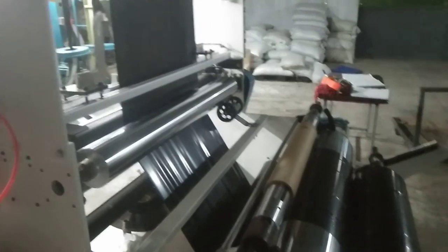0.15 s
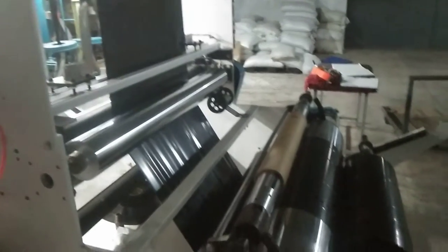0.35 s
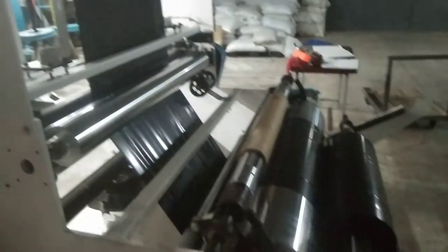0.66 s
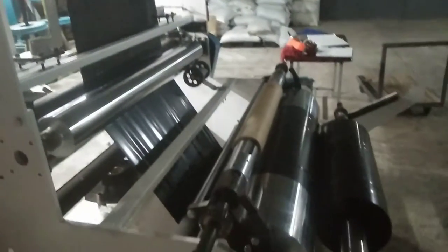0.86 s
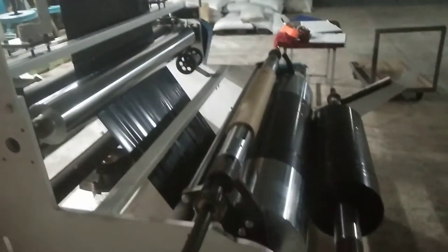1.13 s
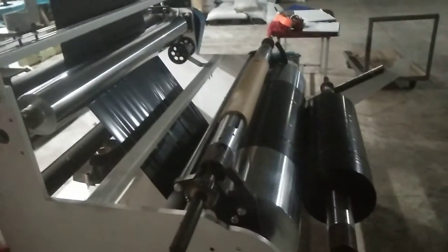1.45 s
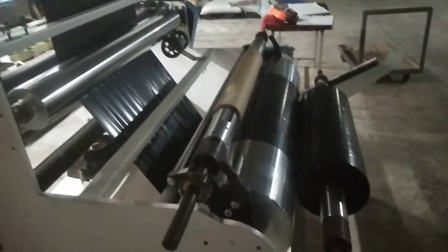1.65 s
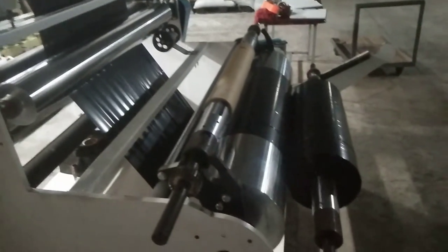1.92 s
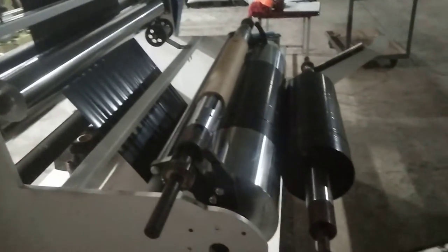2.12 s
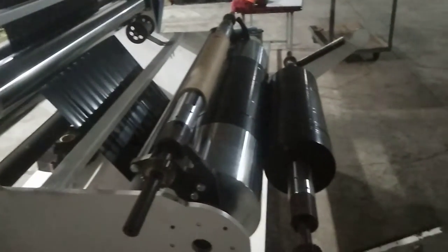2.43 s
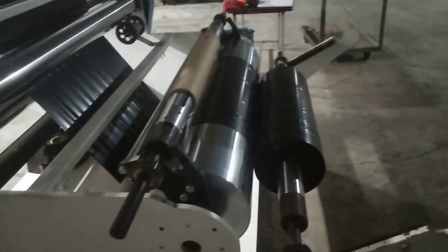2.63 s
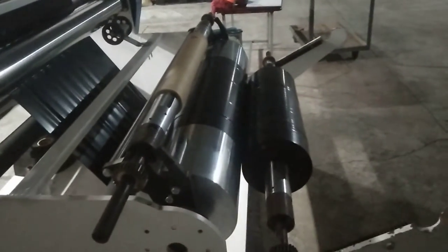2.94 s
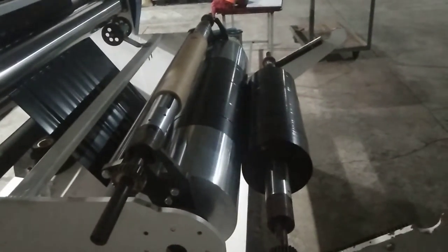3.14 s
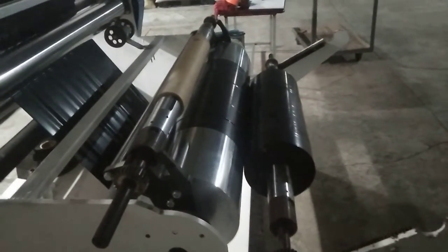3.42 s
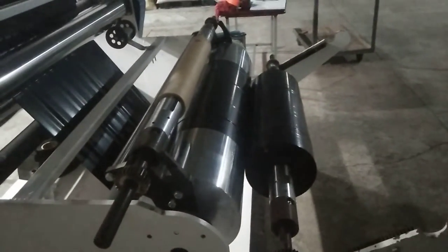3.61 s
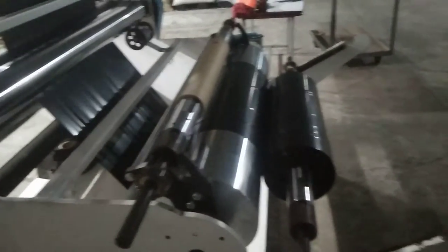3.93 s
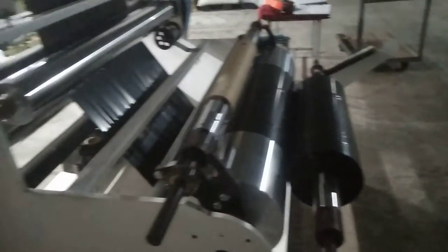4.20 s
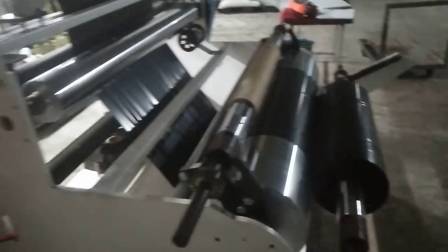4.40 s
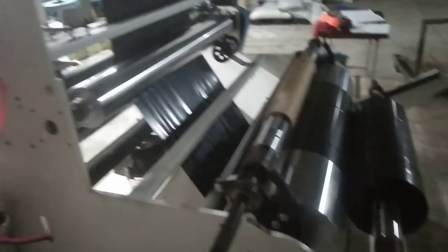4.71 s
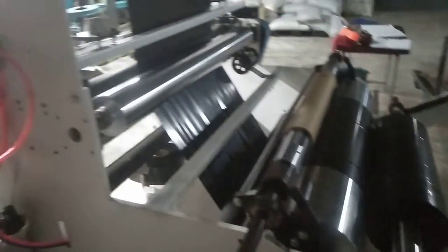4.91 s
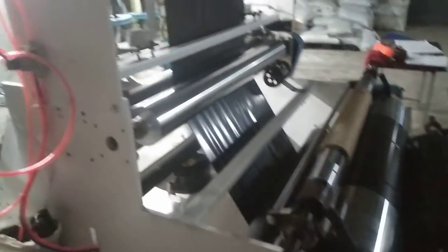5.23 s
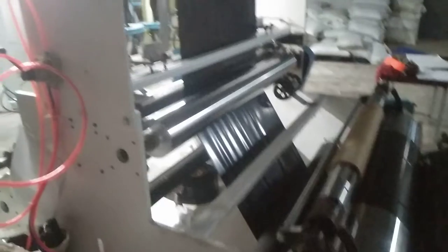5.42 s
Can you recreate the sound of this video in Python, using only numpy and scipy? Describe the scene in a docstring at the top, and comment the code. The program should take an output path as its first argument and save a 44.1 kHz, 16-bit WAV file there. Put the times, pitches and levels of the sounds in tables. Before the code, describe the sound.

For about 5.5 seconds a plastic film winding line runs without pause in a reverberant factory hall, heard from a handheld phone close to the rollers. A loud, shrill cluster of motor tones around 4 kHz dominates, beating into a fast metallic buzz of nearly sixty pulses a second. Fainter, higher tones edge it. Beneath sit a steady low hum, rapid shaft rattle repeating about sixteen times a second, blower roar growing very slightly, and bright hiss from air and film. From about 0.7 to 2.5 seconds, as the phone swings out, the buzz smears into denser flutter; around 3 to 4 it returns to clearer falling chirps, then smears again on the way back. Individual tones swell and dip throughout. A more distant motor near 2 kHz wavers in uneven bursts, most noticeable around 4.3 seconds. Overall loudness stays fairly even, slightly compressed, ending with the machine still running.

```python
"""A factory hall, close to the winder of a plastic film line, heard from a phone that swings slowly
out over the rollers and back.
Inverter-fed motors whine: sidebands round a 4 kHz switching rate beat into a fast buzz, and the loud
ones dip as the phone crosses nodes of their standing waves.
Under them lie the hum of motors and gears, shaft clatter, blower roar and the hiss of air and film."""
import sys
import numpy as np
from scipy import signal
from scipy.fft import rfft, irfft
from scipy.io import wavfile
from scipy.ndimage import uniform_filter1d

SR = 44100
rng = np.random.default_rng(int(sys.argv[2]) if len(sys.argv) > 2 else 0)


def bounce(signal):
    """Save signal as a 16-bit WAV file at the path given by the first command-line argument."""
    frames = np.transpose(np.atleast_2d(signal))
    limited = np.clip(frames, -1, 1)
    pcm = np.round(limited * 32767).astype(np.int16)
    wavfile.write(sys.argv[1], SR, pcm)


N = 245195
TIME = np.arange(N) / SR  # s


def winder_whine():
    """Switched current shakes the stator; evenly spaced odd sidebands beat at twice the supply
    rate and its multiples."""
    switch_hz, supply_hz = 4000.3, 28.987
    # loud sidebands up to this one keep in step and make the beat; those beyond ring on freely
    inner_sideband = 11
    # level of the loud sidebands at the phone: start_s, level_db
    whine_level = [(0, -1), (.4, -1.5), (.75, 1.8), (2, 0.5), (2.35, -1.7), (2.75, 1.7), (3.5, -1.5),
                   (4.6, 0.5), (5, -1.5), (5.56, 1)]
    # higher sidebands arrive earlier, by an amount that changes as the phone moves, so each beat is a
    # falling chirp; long chirps overlap into a faster flutter: start_s, lag_ms_per_khz
    beat_chirp = [(0, -19), (.35, -21), (.7, -104), (1, -132), (1.5, -141), (2.05, -131), (2.5, -76),
                  (2.9, -28), (3.15, -26), (4, -28), (4.35, -64), (5.56, -70)]
    # loud sidebands, standing between the motor and the frame: sideband (multiples of the supply rate),
    # level_db, rise_db_per_cm along the path, reflected share (0-1), node_cm, node spacing_cm
    standing_sidebands = [(-19, -44, -.28, .22, 15.4, 11.4), (-17, -37.8, -.36, .24, 27.5, 12.7),
                          (-13, -37.6, .13, .2, 14.9, 9.9), (-11, -35.7, 0, .71, 17.6, 21.3),
                          (-9, -32, .23, .58, 19.4, 21.6), (-7, -32.5, -.07, .49, 4.4, 18.2),
                          (-5, -26.1, 0, .5, 25.8, 12.25), (-3, -34.3, -.15, .58, 24.5, 10.2),
                          (-1, -30.1, -.11, .62, 3.8, 17.2), (1, -28.7, -.17, .4, 15.6, 17.3),
                          (3, -28.1, .13, .31, 23.1, 20.3), (5, -33, .43, .3, 16.9, 27.6),
                          (9, -29.4, .28, .44, 18.2, 11.2), (15, -39.2, -.21, .2, 11, 7.4)]
    # faint sidebands, diffused by the hall: multiple of the switching rate,
    # sideband (multiples of the supply rate), level_db
    diffuse_sidebands = [(1, -23, -43), (1, -15, -45), (1, 11, -42), (2, -6, -47), (2, -4, -48.5),
                         (2, -2, -50.5), (2, 0, -48), (2, 2, -45), (2, 4, -59), (2, 8, -62), (3, -3, -66),
                         (3, -1, -65), (3, 3, -64), (3, 5, -62)]

    whine_db, = curves(whine_level)
    lag_ms_per_khz, = curves(beat_chirp)
    whine = np.zeros(N)
    for side, db, *reflection in standing_sidebands:
        offset_hz = side * supply_hz
        start = None
        if abs(side) <= inner_sideband:
            # a lag proportional to the offset is a phase that grows with its square
            start = -lag_ms_per_khz * (offset_hz / 1000) ** 2 / 2
        wave = standing_wave(*reflection)
        sideband = tone(switch_hz + offset_hz, scatter=0.08, rate=1.64, start=start, wave=wave)
        whine += undb(db + whine_db) * sideband
    for multiple, side, db in diffuse_sidebands:
        hz = multiple * switch_hz + side * supply_hz
        whine += undb(db) * tone(hz, scatter=0.19, rate=1.63)
    return whine


def slot_whine():
    """Rotor slots add tones off the sideband grid; the loud ones swell and dip as the phone moves."""
    # loud slot tones, each with its standing wave: pitch_hz, level_db, rise_db_per_cm along the path,
    # reflected share (0-1), node_cm, node spacing_cm
    standing_tones = [(3284, -39.5, -.08, .29, 26.5, 21.9), (3458.5, -38.2, .46, .63, 8, 18.1),
                      (4542.2, -37.9, -.1, .68, 16.2, 45), (4716, -31.3, .31, .31, 26.4, 22.6)]
    # faint slot tones riding on the switching: pitch_hz, level_db
    faint_tones = [(3401, -45), (4370, -44), (4598, -46), (5329, -47), (7372, -52), (7488, -54),
                   (8455.5, -47)]

    whine = np.zeros(N)
    for hz, db, *reflection in standing_tones:
        whine += undb(db) * tone(hz, scatter=0.07, rate=1.33, wave=standing_wave(*reflection))
    for hz, db in faint_tones:
        whine += undb(db) * tone(hz, scatter=0.24, rate=2.06)
    return whine


def machine_hum():
    """Fans and gears hum firmly, wavering slightly with the load."""
    # steady tones of fans and gears: pitch_hz, level_db
    hum_tones = [(68, -53), (161.4, -32.5), (240.2, -45.5), (1536.1, -49)]
    return sum(undb(db) * tone(hz, scatter=0.07, rate=4) for hz, db in hum_tones)


def shaft_clatter():
    """The same rattle returns at every shaft turn, smeared by the hall into a comb of harmonics."""
    shaft_hz = 15.857
    # clatter of one shaft turn, before the panels lift it: pitch_hz, level_db per harmonic
    clatter_spectrum = [(100, -51.5), (220, -47.5), (400, -47.5), (700, -49), (900, -53.5), (1300, -59.5),
                        (2000, -53), (2600, -66)]
    # harmonics that stand out: order (multiples of the turn rate), level_db
    strong_orders = [(11, -40), (19, -37), (20, -39), (23, -42), (26, -42), (33, -44), (38, -41), (40, -41),
                     (44, -43), (47, -43), (49, -44), (64, -41.5), (88, -47)]

    orders = np.arange(170)
    harmonic_hz = orders * shaft_hz
    hz, db = np.transpose(clatter_spectrum)
    level_db = np.interp(harmonic_hz, hz, db, left=-100) + panel_db(harmonic_hz)
    level_db += 1.2 * rng.standard_normal(len(orders))
    for order, strong_db in strong_orders:
        level_db[int(order)] = strong_db

    size = 4096  # points in one turn
    random_phase = np.exp(2j * np.pi * rng.random(len(orders)))
    # scaled so that each level is the rms of its harmonic
    turn = irfft(undb(level_db) * random_phase, size) * size / np.sqrt(2)
    turns = shaft_hz * TIME + 0.0027 * walk(5)  # the belt drive runs slightly unevenly
    clatter = np.interp(turns % 1, np.arange(size) / size, turn, period=1)
    return clatter * undb(1.24 * walk(8))


def second_drive():
    """A farther motor sings an octave lower, drifting a little in pitch and coming in uneven bursts."""
    # main tone of this motor, switched at 2 kHz: start_s, pitch_hz, level_db
    main_tone = [(0, 1982, -51), (.47, 1982, -43), (.9, 1983, -41), (2.2, 1980, -41), (2.8, 1979, -36),
                 (3.95, 1982, -39), (4.25, 1986, -32.5), (5.05, 1986, -37), (5.33, 1984, -34.5),
                 (5.56, 1983, -39)]
    # side tones: pitch_hz, level_db
    side_tones = [(1919, -46), (2000.5, -45), (2017.7, -43), (2080.4, -45), (2151.7, -45), (2748, -48),
                  (3102, -50), (5938, -45), (6024, -51), (6067, -48)]
    # level added to all the side tones: start_s, level_db
    sides_level = [(0, -4), (1.2, -2), (2.2, -1.5), (2.8, .5), (4.4, .5), (5.56, -1.5)]

    main_hz, main_db = curves(main_tone)
    sides_db, = curves(sides_level)
    main = undb(main_db) * tone(0, scatter=0.55, rate=22, start=np.cumsum(main_hz) / SR)
    sides = sum(undb(db) * tone(hz, scatter=0.4, rate=3) for hz, db in side_tones)
    return main + undb(sides_db) * sides


def air():
    """Blowers roar through the hall; cooling air and running film hiss with a slight flutter."""
    # blower roar, relative: pitch_hz, level_db per Hz
    roar_spectrum = [(25, -35), (45, -15), (70, -9), (100, -5.5), (130, 4.5), (160, 2.5), (200, 2.5),
                     (260, -5.5), (400, -2), (520, -5), (700, -5.5), (1200, -4.5), (2100, -6.5), (2700, -7),
                     (5000, -38)]
    # air and film hiss, relative: pitch_hz, level_db per Hz
    hiss_spectrum = [(2000, -22.5), (3100, -3), (3600, 1), (3950, 3), (4500, -0.5), (5200, -5.5),
                     (6900, -9.5), (7800, -5), (8800, -7.5), (9900, -15), (10500, -25), (12100, -24.5),
                     (13000, -39), (15500, -64)]
    # the roar grows slowly from its starting level
    roar_db, roar_rise_db_per_s, hiss_db = -26.5, 0.275, -26.5

    roar_level_db = roar_db + roar_rise_db_per_s * TIME + 0.12 * walk(4.8)
    roar = undb(roar_level_db) * coloured(roar_spectrum, ripple_db=2.0, spacing_hz=9)
    hiss_level_db = hiss_db + 0.34 * walk(16)
    hiss = undb(hiss_level_db) * coloured(hiss_spectrum, ripple_db=2.5, spacing_hz=23)
    return roar + hiss


def standing_wave(rise_db_per_cm, reflected, node_cm, spacing_cm):
    """Complex gain (rms 1) of a tone plus its reflection: it slopes along the path and dips at nodes."""
    # the phone swings out, rests and returns: start_s, place_cm along its path
    phone_path = [(0, 2.4), (.3, 2.6), (.6, 5.6), (1.5, 9.7), (2.3, 19.1), (2.9, 27.6), (3.5, 28.6),
                  (4, 27.4), (4.4, 19.9), (4.9, 9.2), (5.25, 1.5), (5.56, -1.2)]
    place_cm, = curves(phone_path)
    reflection = reflected * np.exp(2j * np.pi * (place_cm - node_cm) / spacing_cm)
    gain = undb(rise_db_per_cm * place_cm) * (1 - reflection)
    return gain / np.sqrt(np.mean(np.abs(gain) ** 2))


def panel_db(hz):
    """The lift that the ringing panels of the machine frame give to each frequency."""
    # resonances of the panels: centre_hz, width_hz, lift_db
    panels = [(297.5, 35, 4), (397, 28, 3), (623, 25, 6.5), (763, 26, 3.5), (1002, 43, 4), (1920, 110, 2)]
    return sum(lift / (1 + (2 * (hz - centre) / width) ** 2) for centre, width, lift in panels)


def tone(hz, scatter, rate, start=None, wave=1):
    """A sine of rms 1 plus wandering hall reflections, heard through a standing wave if given."""
    path = 1 + scatter * (walk(rate) + 1j * walk(rate))
    path = wave * path
    path = path / np.sqrt(np.mean(np.abs(path) ** 2) / 2)
    if start is None:
        start = rng.random()  # cycles
    phase = 2 * np.pi * (hz * TIME + start)
    return path.real * np.cos(phase) - path.imag * np.sin(phase)


def coloured(spectrum, ripple_db, spacing_hz):
    """Noise of rms 1 with a smooth spectrum, lifted by the panels and rippled by hall resonances."""
    hz = np.arange(N // 2 + 1) * SR / N
    points, db = np.transpose(spectrum)
    shape_db = np.interp(np.log(hz + 1), np.log(points), db) + panel_db(hz)
    grid = np.arange(0, SR / 2, spacing_hz)
    ripple = np.interp(hz, grid, rng.standard_normal(len(grid)))
    ripple = ripple_db * ripple * hz / (hz + 250)  # shallower in the bass
    noise = irfft(rfft(rng.standard_normal(N)) * undb(shape_db + ripple), N)
    return noise / np.std(noise)


def walk(rate):
    """Random levels held 1 / rate s and slewed twice; spread near 1."""
    k = int(SR / rate)
    held = np.repeat(rng.standard_normal(N // k + 3), k)
    start = rng.integers(k)
    slewed = uniform_filter1d(uniform_filter1d(held, k), k)
    return 1.12 * slewed[start:start + N]


def curves(table):
    """The columns of a table of (start_s, value, ..), joined by straight lines at every sample."""
    s, *columns = np.transpose(table)
    return [np.interp(TIME, s, column) for column in columns]


def undb(db):
    """Decibels to gain."""
    return 10 ** (np.asarray(db) / 20)


def scene():
    """All the parts of the line at one microphone, ahead of the phone's gain control."""
    line = winder_whine() + slot_whine() + machine_hum() + shaft_clatter()
    return (line + second_drive() + air())[None]


def record(dry):
    """The phone's gain control evens the loudness; it rounds the highest peaks and cuts the top."""
    target_db, strength, top_hz = -16.6, 0.7, 15650  # strength: share of the gap to the target closed
    heard_db = 10 * np.log10(uniform_filter1d(dry ** 2, int(0.3 * SR)) + 1e-12)
    held = dry * undb(strength * (target_db - heard_db))
    rounded = np.tanh(0.7 * held) / 0.7
    top_cut = signal.ellip(14, 0.1, 80, top_hz, fs=SR, output="sos")
    return signal.sosfilt(top_cut, rounded)


dry = scene()
out = record(dry)
bounce(out)
```